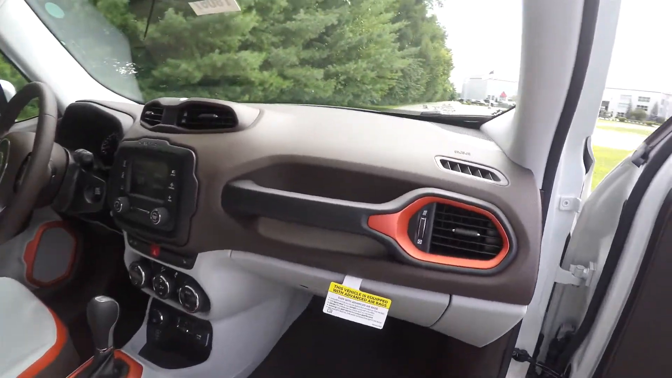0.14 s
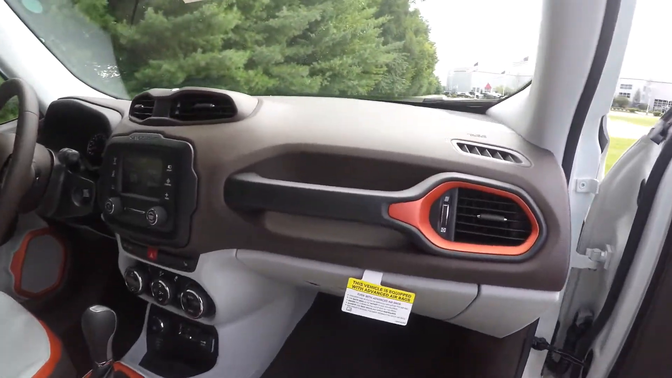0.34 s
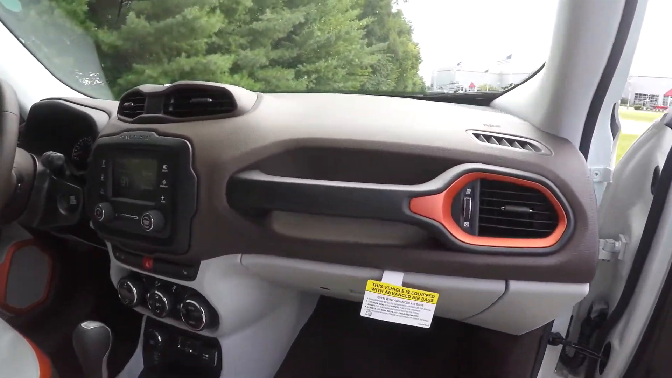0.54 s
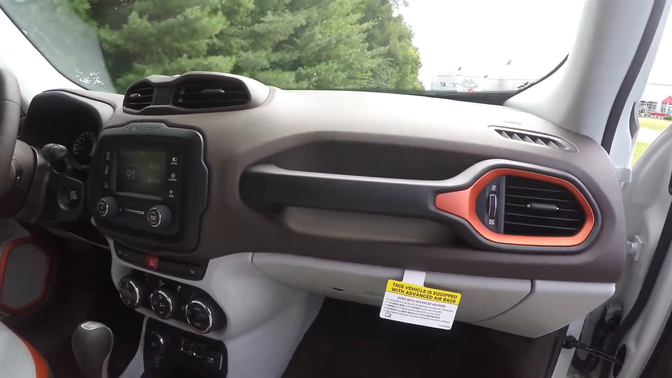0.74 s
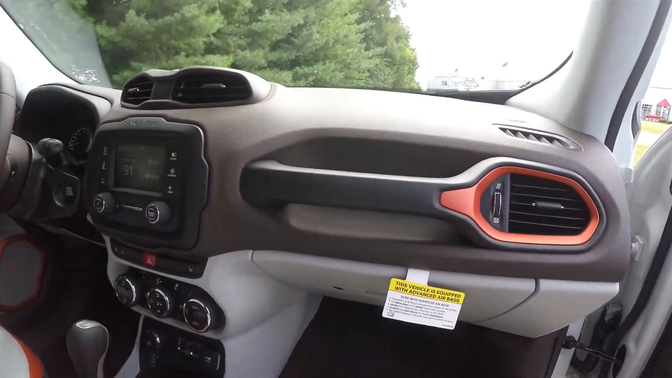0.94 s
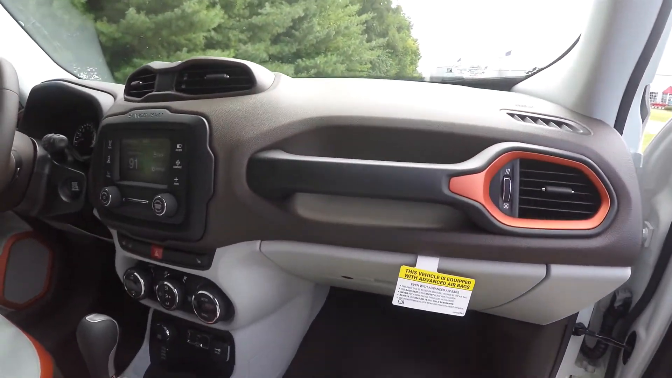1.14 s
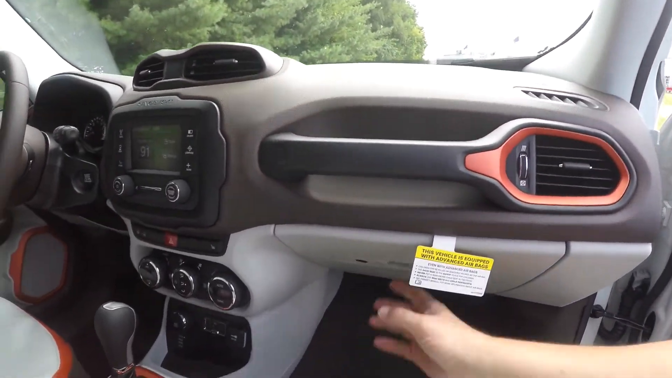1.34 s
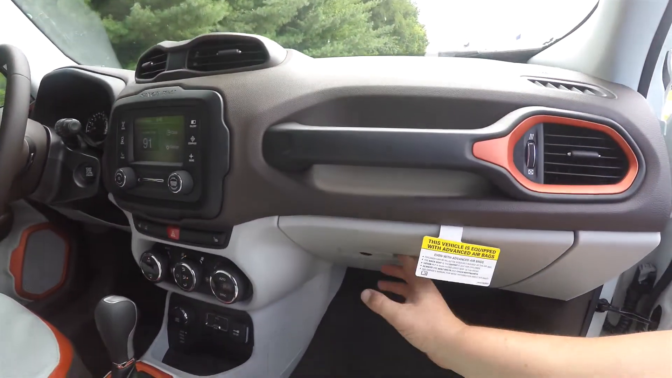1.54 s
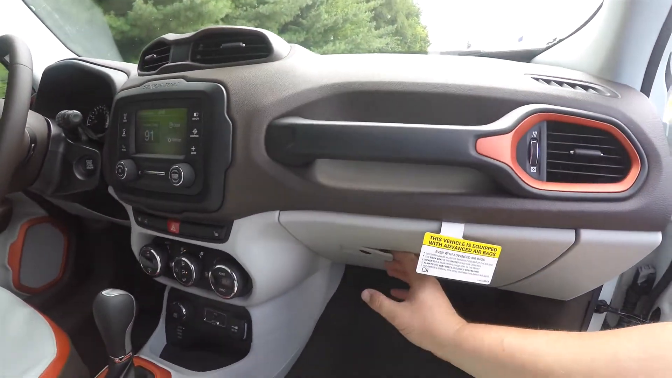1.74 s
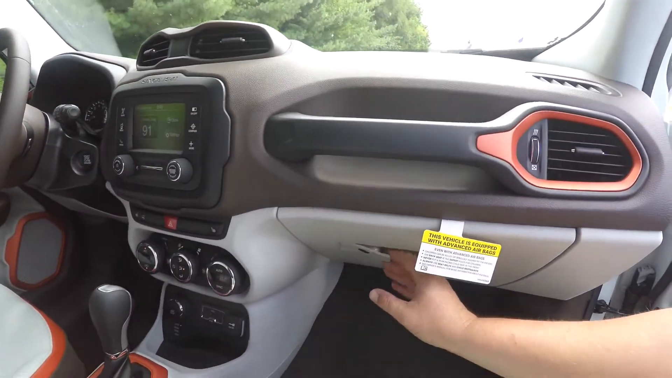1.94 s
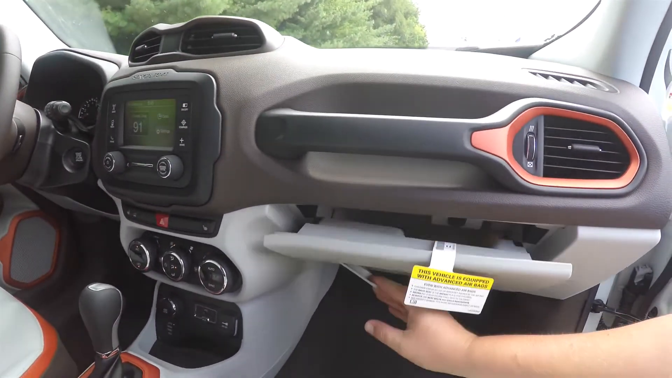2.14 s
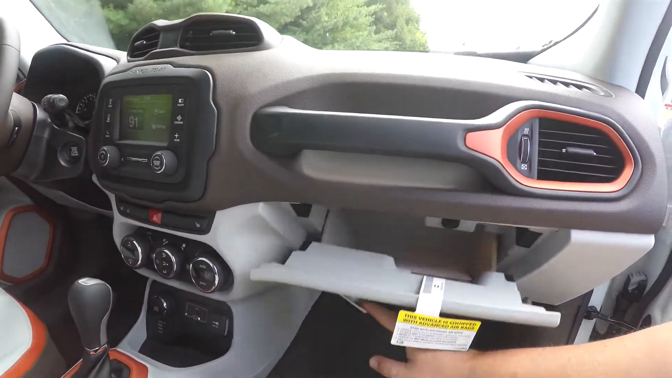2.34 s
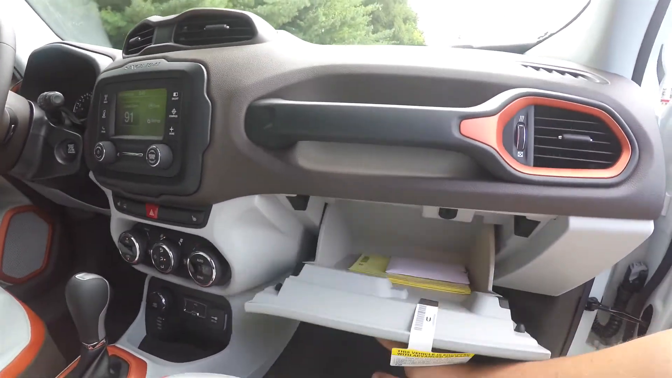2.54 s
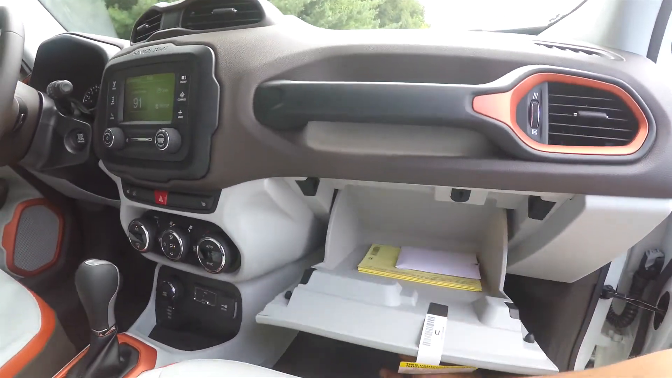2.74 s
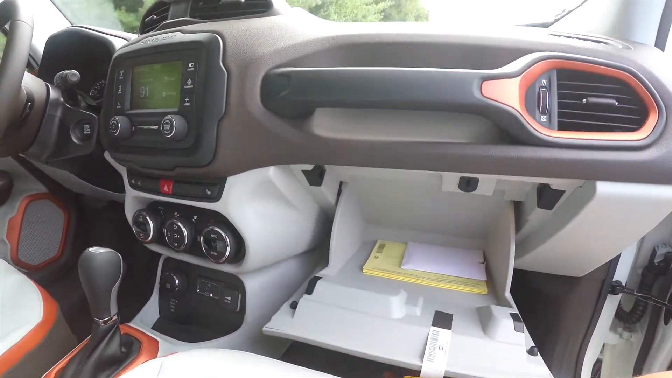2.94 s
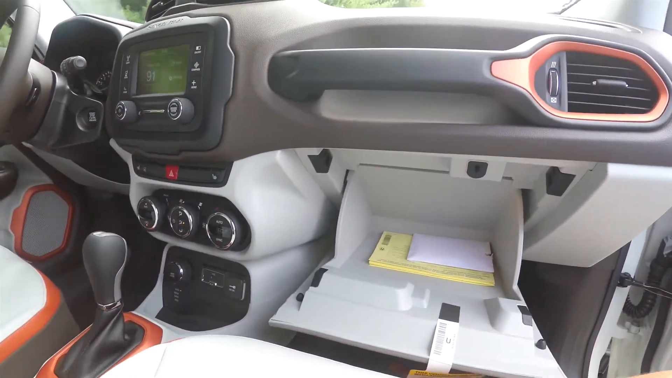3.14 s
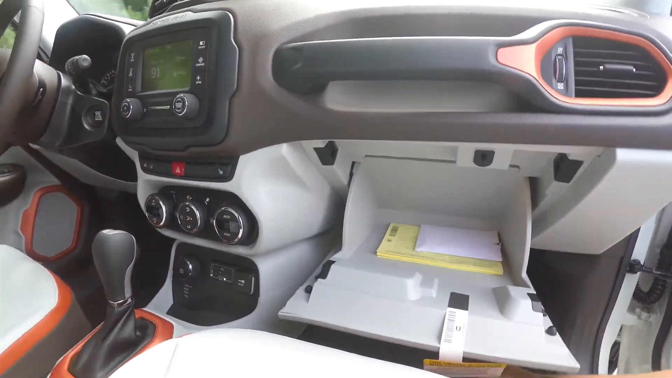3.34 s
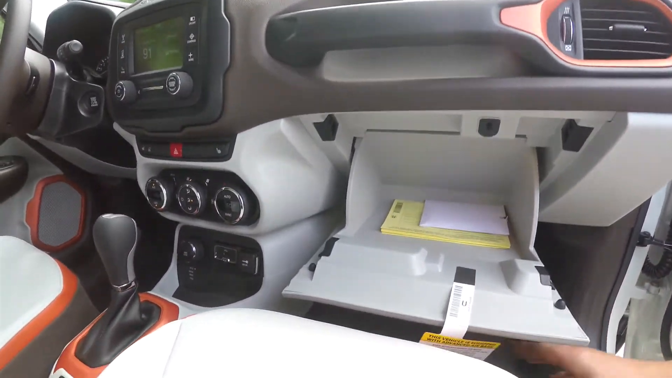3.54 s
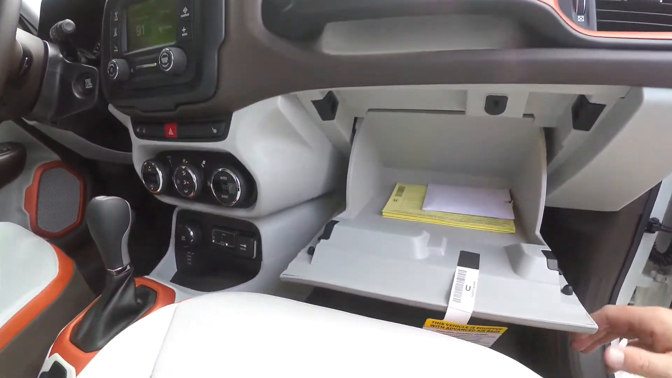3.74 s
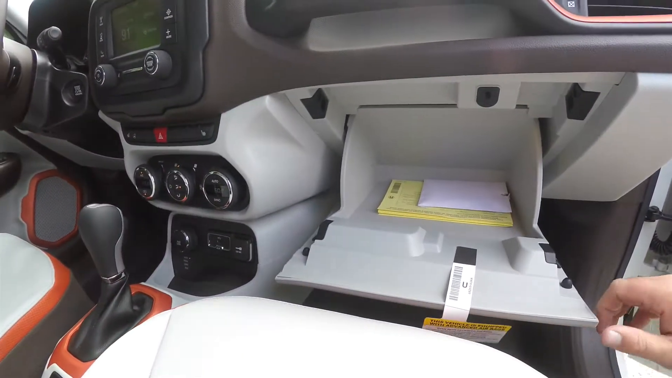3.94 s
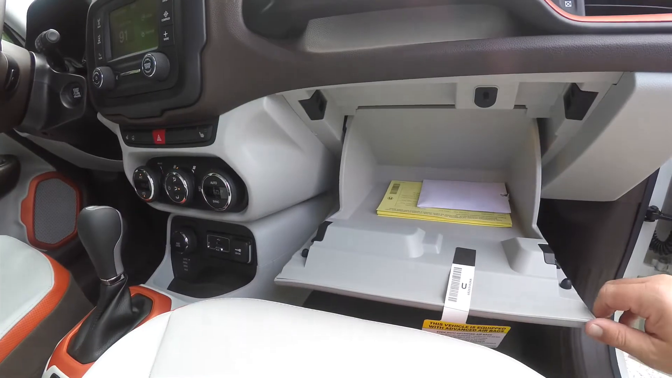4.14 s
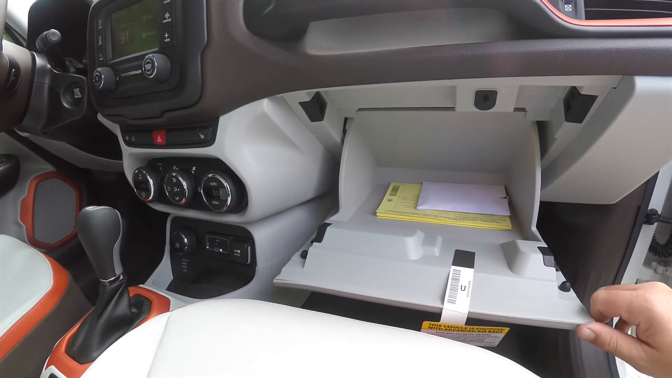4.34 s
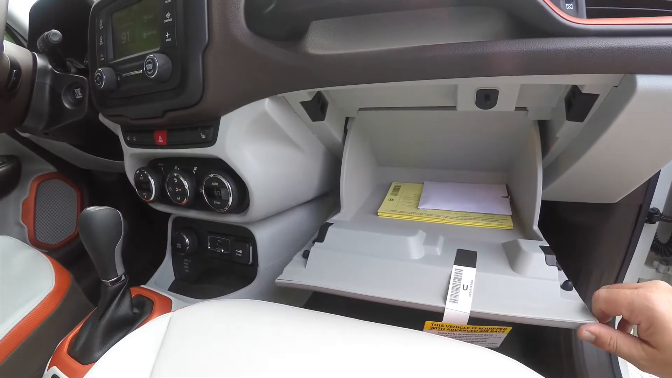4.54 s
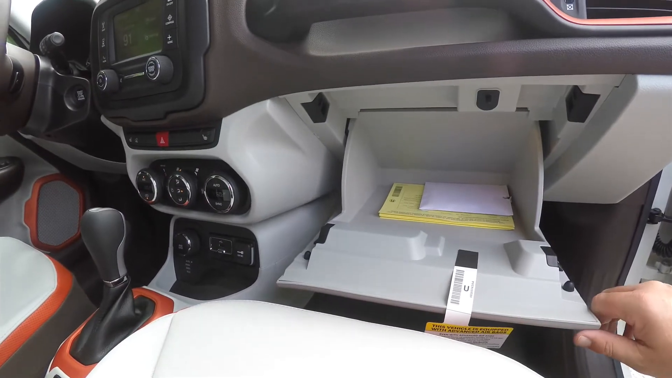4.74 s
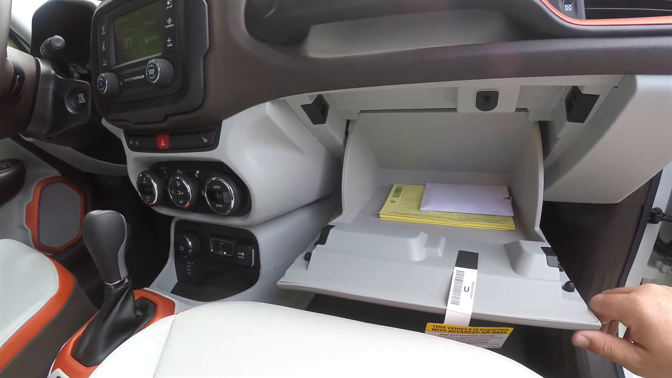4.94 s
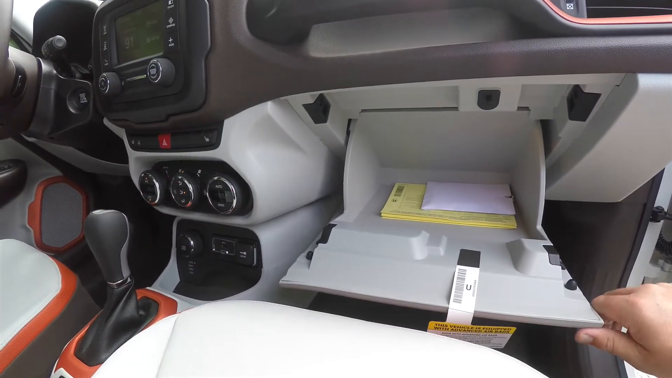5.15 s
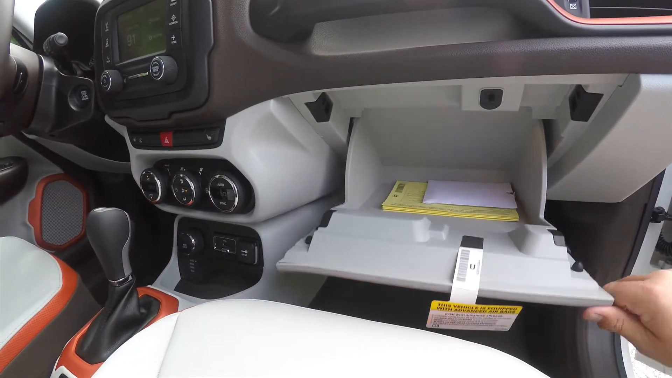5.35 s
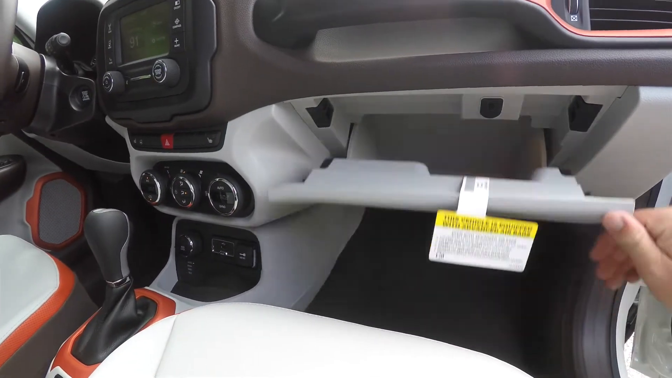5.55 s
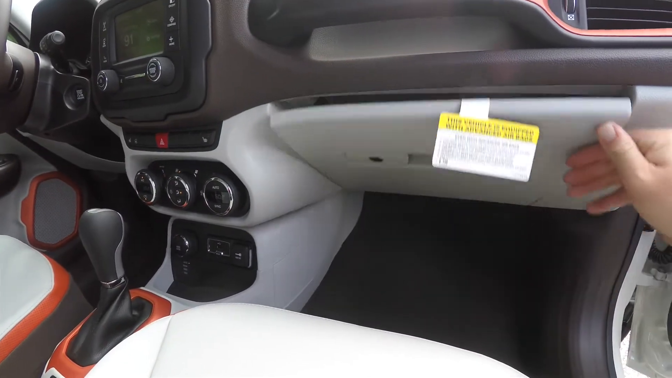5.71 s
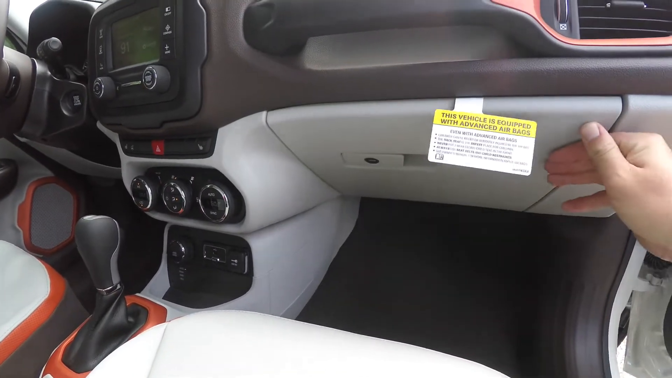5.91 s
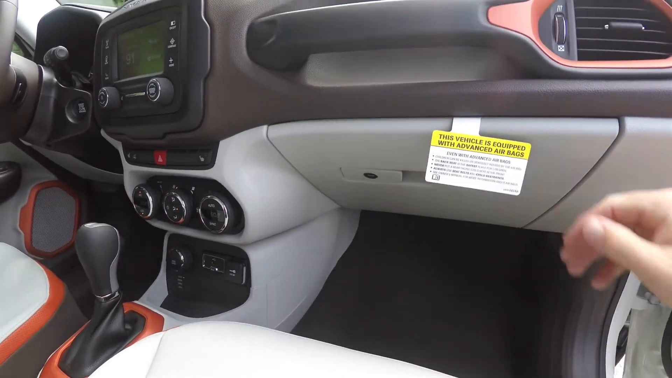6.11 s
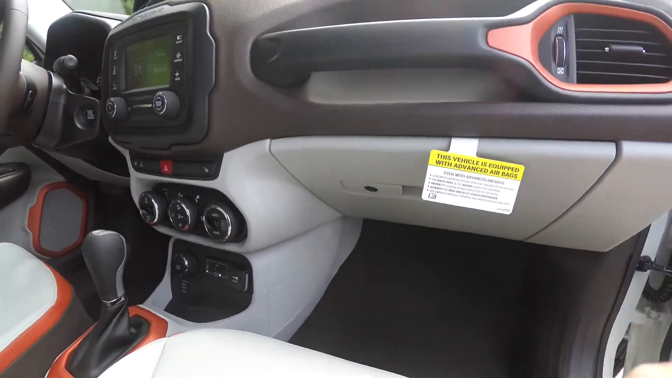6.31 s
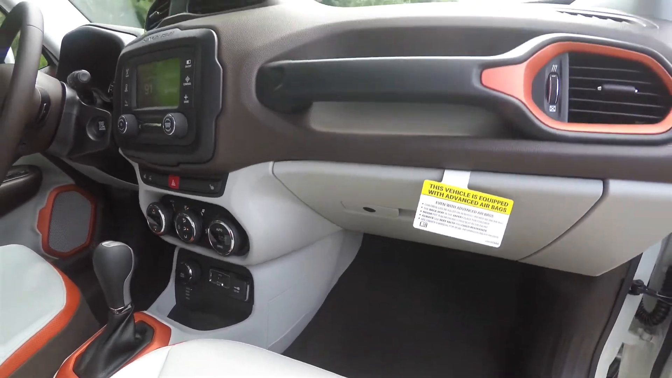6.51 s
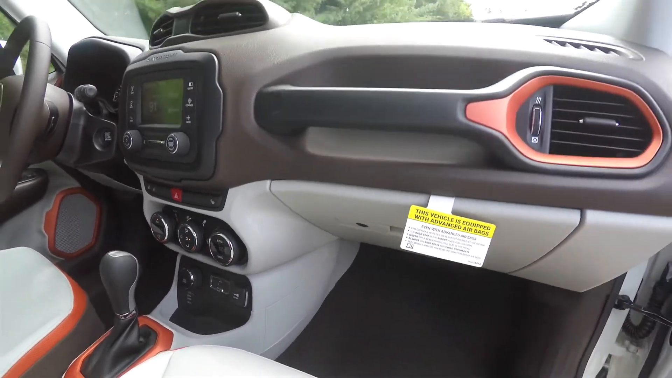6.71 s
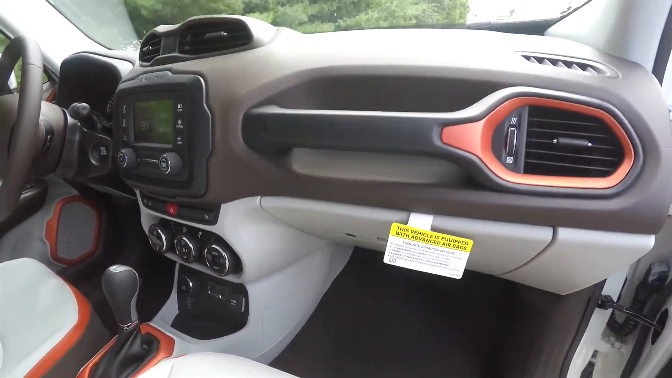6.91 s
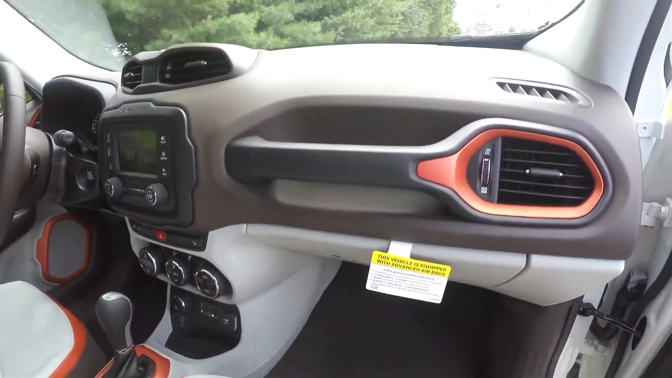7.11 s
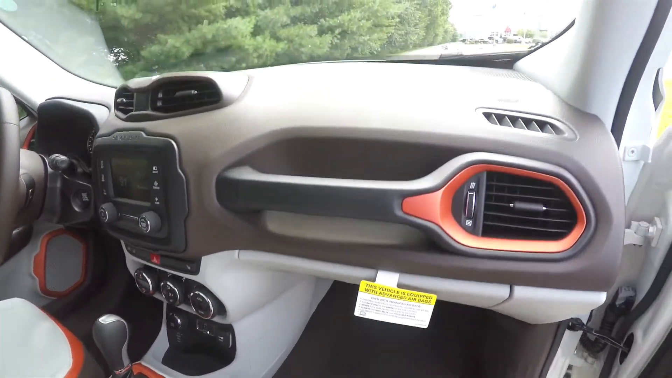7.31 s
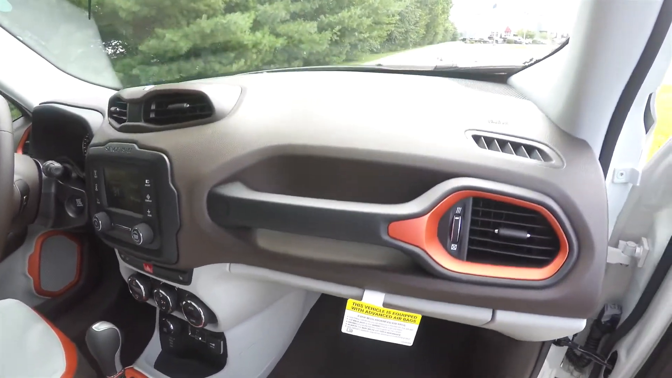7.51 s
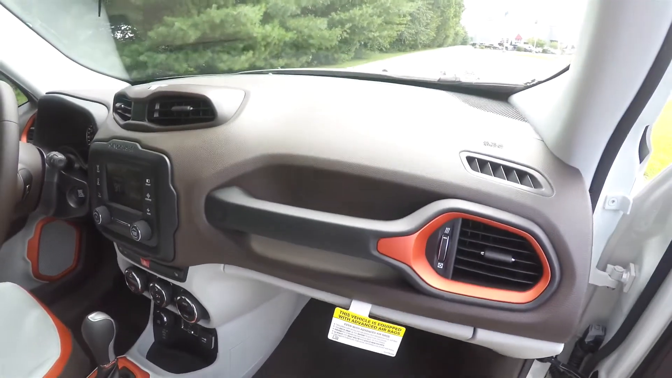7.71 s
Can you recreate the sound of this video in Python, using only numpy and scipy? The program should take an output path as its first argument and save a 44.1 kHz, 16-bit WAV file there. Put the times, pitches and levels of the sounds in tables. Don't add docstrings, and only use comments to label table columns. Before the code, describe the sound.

Close inside a parked car, with steady traffic wash and faint idle rumble through the open door, fingers tap softly on plastic trim. A latch clicks and the lid is released, then knocks sharply against its stops. Light taps follow, a passing engine drones low, and the lid is shut with a loud, rattly double snap. A few soft taps end it. A small camera microphone at arm's length gives a hissy stereo.

```python
import sys
import numpy as np
from scipy import signal
from scipy.fft import rfft, irfft, next_fast_len
from scipy.io import wavfile
from scipy.ndimage import uniform_filter1d, map_coordinates

SR = 44100
rng = np.random.default_rng(int(sys.argv[2]) if len(sys.argv) > 2 else 0)


def master(y):
    cut = np.clip(np.atleast_2d(y).T, -1, 1)
    pcm = np.round(cut * 32767)
    wavfile.write(sys.argv[1], SR, pcm.astype(np.int16))


def field_ratio(decibels):
    return 10 ** (np.asarray(decibels, dtype=float) / 20)


N = 347067

# time in seconds, strength in dB.
ROAD_WASH = [(0.0, -41.5), (0.42, -40.5), (0.63, -42.5), (1.3, -42), (2.12, -42), (2.3, -45), (3.22, -44.5),
             (3.4, -43), (3.7, -43.5), (4.1, -44.5), (4.45, -45), (5.0, -44.5), (5.6, -46), (6.14, -46.5),
             (7.3, -42.5), (7.54, -40), (7.87, -43.5)]
# time in seconds, strength in dB.
NEAR_TYRES = [(0.0, -46), (0.39, -44), (0.68, -47.5), (0.88, -47.5), (1.14, -43.5), (1.47, -47.5),
              (1.86, -45), (2.39, -46.5), (2.63, -44), (3.0, -47.5), (4.38, -45), (4.49, -47),
              (5.74, -46.5), (6.27, -45.5), (7.36, -45.5), (7.87, -47)]
# frequency in Hz, level in dB per Hz.
RUMBLE_SUM = [(8, -17.5), (14, -0.5), (27, -3), (35, -16.5), (50, -4.5), (70, -19.5), (110, -12.5),
              (180, -13.5), (254, -16), (345, -23.5), (450, -30.5), (800, -120)]
ROAD_SUM = [(190, -26), (330, -15), (350, -51.5), (404, -13), (445, -12), (539, -8.5), (617, -6.5),
            (693, -6.5), (890, -2), (1560, -7), (1750, -7.5), (2310, -8.5), (3300, -38), (4290, -91),
            (7260, -120)]
HISS_SUM = [(1760, -34.5), (3000, -18), (3440, -9.5), (4530, 4.5), (4950, -3.5), (5420, -20.5), (6090, -3),
            (6470, -1.5), (6980, -6.5), (7900, -6.5), (8520, -15), (9510, -18), (10300, -24), (13000, -28),
            (15500, -47)]
ROAD_DIFFERENCE = [(12, -36), (20, 4.5), (35, 5), (65, -23.5), (150, -13), (325, -29), (871, -8),
                   (1780, -10), (2330, -16), (3000, -19.5), (3900, -38), (6600, -120)]
HISS_DIFFERENCE = [(1530, -36), (2600, -1.5), (3060, -1.5), (4390, 6), (5250, -0.5), (6370, -25),
                   (6760, -38), (7180, -26), (7510, -13), (7910, -15), (8720, -24.5), (9820, -17),
                   (11300, -30.5), (13600, -36), (15500, -46.5)]
# time in seconds, dB by which the ports cancel in their null.
CAMERA_AIM = [(0, -1), (.6, 1), (1.6, -1.5), (1.95, 0.5), (2.7, 5), (2.95, 1.5), (3.5, 2.5), (3.85, 6.5),
              (4.0, 11), (4.7, 7), (5.3, 4), (5.45, -1), (5.65, 6), (5.9, 1.5), (6.45, 3.5), (6.8, 3),
              (7.1, -3.5), (7.4, -2)]
# frequency in Hz, level in dB rms.
IDLE_LINES = [(22.4, -40.5), (45, -53.5), (98, -59)]
# time in seconds, pitch of shaft order 11 in Hz, its level in dB.
PASSING_ENGINE = [
    (4.2, 205, -54.5),
    (4.6, 206, -54.5),
    (5.0, 218, -43.5),
    (5.3, 210, -40.5),
    (5.8, 208, -39.5),
    (6.2, 212, -41.5),
    (7.0, 207, -43.5),
    (7.5, 202, -46),
    (7.87, 200, -49.5),
]
# shaft order as a number, level in dB re order 11.
SHAFT_ORDERS = [(5, -15), (6, -18), (8, -17), (9, -16), (12, -18), (13, -13)]
# start in seconds, peak in dB, pitch in Hz, t60 in seconds.
SOFT_TAPS = [(0.053, -18.5, 806, 0.037), (0.437, -19.5, 910, 0.079), (0.457, -20.5, 616, 0.06),
             (0.49, -25, 904, 0.24), (0.562, -23, 910, 0.099), (0.6665, -13.5, 905, 0.025),
             (0.884, -20.5, 700, 0.04), (1.008, -20.5, 653, 0.081), (1.274, -21, 957, 0.081),
             (1.445, -29, 600, 0.058), (1.57, -25.5, 630, 0.11), (2.1, -15.5, 840, 0.032),
             (2.345, -20.5, 1000, 0.028), (2.46, -26, 1850, 0.071), (2.557, -24, 1980, 0.072),
             (2.589, -32, 1815, 0.5), (2.697, -21.5, 860, 0.087), (2.779, -24, 802, 0.073),
             (2.814, -26, 647, 0.093), (2.894, -20, 667, 0.087), (3.7515, -9.5, 763, 0.025),
             (3.764, -16, 780, .03), (3.774, -19, 754, .03), (3.8665, -9.5, 770, 0.017),
             (3.879, -21, 760, .03), (3.935, -26, 780, 0.089), (4.295, -18, 908, 0.069),
             (4.297, -28, 1408, 0.19), (4.372, -23, 990, 0.05), (4.41, -21.5, 1020, 0.05),
             (4.445, -28, 1026, 0.32), (4.89, -18, 1010, 0.02), (4.948, -23, 1000, 0.088),
             (6.392, -22, 707, 0.043), (6.963, -21.5, 810, 0.12), (7.205, -38, 1020, .06),
             (7.4815, -14.5, 990, 0.03), (7.528, -19, 720, .04), (7.54, -19, 1250, 0.044),
             (7.593, -14, 1000, 0.036), (7.746, -28, 1000, 0.025)]
# start in seconds, peak in dB, pitch in Hz, t60 in seconds.
TRIM_SCUFFS = [(0.359, -42, 930, 0.24), (.455, -40, 450, 0.05), (.49, -41, 875, 0.27),
               (.668, -42, 700, 0.1), (1.005, -42.5, 750, .12), (2.44, -45, 990, .2),
               (2.696, -39, 750, 0.14), (2.701, -46, 1800, 0.11), (2.776, -42, 1510, 0.14),
               (2.78, -42, 2200, 0.083), (2.81, -42, 800, .1), (2.81, -46, 1800, 0.08),
               (2.844, -44.5, 1050, 0.056), (2.89, -39, 900, 0.098), (2.893, -43, 2090, 0.077),
               (4.295, -40, 1040, 0.23), (4.375, -47, 1450, .2), (4.44, -43, 1000, 0.35),
               (4.495, -44, 1400, 0.053), (7.391, -42, 950, .2), (7.52, -40, 1150, .3),
               (7.585, -39, 1200, 0.12)]
# start in seconds, latch ring in dB, panel push in dB, panel pitch in Hz.
LID_CONTACTS = [(2.026, -27.5, -32, 443), (2.03, -26.5, -17, 950), (2.0308, -25, -15.5, 484),
                (2.032, -29, -33.5, 770), (2.0343, -26.5, -34.5, 1575), (2.0374, -41, -15, 1170),
                (2.046, -35, -22, 836), (2.05, -27.5, -28.5, 433), (2.06, -41, -24.5, 1000),
                (2.307, -29, -25.5, 780), (2.316, -32, -25, 390), (3.312, -36.5, -25, 477),
                (3.3185, -24, -13, 499), (3.3213, -28.5, -8.5, 444), (3.322, -13, -29, 1200),
                (3.3245, -23.5, -8.5, 579), (3.33, -33, -21, 850), (3.335, -44, -15, 745),
                (3.343, -41, -24, 750), (3.34, -44, -30.5, 440), (5.7609, -19.5, -20, 408),
                (5.7637, -13.5, -22, 1114), (5.767, -14.5, -24.5, 600), (5.7751, -12, -17, 815),
                (5.783, -18, -17, 770), (5.79, -22.5, -22.5, 383), (5.798, -19, -15.5, 970),
                (5.8015, -13.5, -21, 690), (5.806, -18, -15.5, 720), (5.8095, -23, -13.5, 600),
                (5.814, -27.5, -16.5, 705), (5.82, -23.5, -21, 850), (5.83, -40.5, -40, 775)]
# start in seconds, snap in dB, length in seconds.
EDGE_CLACKS = [
    (2.0505, -41, .006),
    (2.307, -44.5, .002),
    (3.3195, -34, .004),
    (5.76, -38, .005),
    (5.7988, -26, .0035),
    (7.3822, -49, .0012),
]
# centre in Hz, width in Hz, level in dB.
PANEL_MODES = [(179, 44, -8), (350, 110, -5.5), (535, 150, 6), (770, 230, 18), (1200, 310, -11)]
LATCH_MODES = [(1070, 1160, -14), (1580, 300, -9.5), (1820, 59, -10.5), (2094, 255, -1.5), (2300, 176, 0.5),
               (2660, 490, -12.5)]
# frequency in Hz, level in dB per Hz.
SNAP_SUM = [(1760, -25), (3000, -3), (3100, -15.5), (4690, 1), (5490, -10), (6300, 0), (6700, -9),
            (7480, -7), (8180, -10), (9190, -14), (10600, -21), (11700, -17), (13500, -29), (14400, -27),
            (15500, -36)]
SNAP_DIFFERENCE = [(1500, -40), (2600, -4.5), (3750, -1.5), (4550, 3), (5740, -10.5), (6760, -29),
                   (7560, -12.5), (8900, -16.5), (9800, -16.5), (11500, -29), (12600, -44), (13400, -30),
                   (15500, -40)]
# start in seconds, peak in dB, pitch in Hz, t60 in seconds.
PAWL_NOTES = [(2.033, -20.5, 2300, 0.04), (2.04, -32, 2300, 0.025), (2.308, -33, 2210, .03),
              (2.896, -28, 1930, 0.036), (2.895, -31.5, 2344, 0.064), (3.31, -27, 2380, .04),
              (3.3172, -17, 2130, .03), (3.3215, -11.5, 2380, 0.022), (3.3205, -11, 1746, 0.022),
              (5.764, -17, 2230, .03), (5.7748, -10, 2190, 0.029), (5.798, -17.5, 2570, 0.016),
              (5.8012, -11.5, 1870, 0.036), (5.807, -13.5, 2300, 0.038), (5.819, -36, 2300, .04)]
# start in seconds, peak in dB, pitch in Hz, t60 in seconds.
LATCH_TINGS = [(2.031, -36, 4520, 0.024), (2.05, -48, 7400, .035), (2.051, -48.5, 4570, 0.035),
               (2.308, -49, 4630, 0.032), (3.319, -44, 4690, .04), (3.3195, -36, 6180, .05),
               (5.761, -46, 6500, .04), (5.766, -38, 4680, .04), (5.766, -47, 7860, .04),
               (5.777, -29.5, 4700, .03), (5.783, -40, 6440, 0.029), (5.7985, -34, 4700, 0.018),
               (5.8, -36.5, 6460, 0.057), (5.802, -40.5, 8100, 0.045), (5.806, -38, 4700, 0.033)]
# frequency in Hz, difference over sum in dB.
TING_DIFFERENCE = [(4600, 8), (6500, -15), (7800, 0.5)]
# start in seconds, peak in dB, pitch in Hz, t60 in seconds.
CABIN_BOOMS = [
    (2.046, -26, 46.4, 0.15),
    (3.321, -32, 179, 0.36),
    (3.322, -23, 254, 0.044),
    (5.759, -26.5, 85, .09),
    (5.775, -27, 151, 0.08),
    (5.763, -38.5, 252, 0.42),
    (5.797, -22.5, 31, 0.14),
    (5.8, -40, 176, 0.1),
    (5.802, -27.5, 114, 0.077),
    (5.842, -17.5, 46, 0.14),
]
# frequency in Hz, t60 in seconds.
CABIN_DECAY = [(150, 0.32), (600, 0.056), (2500, 0.092), (10000, 0.05)]
MUTE_BANDS = [2700, 3050, 3450, 3800, 4150, 5170, 5680, 6300, 6900, 7250, 7600, 8300, 8950, 9650, 10300,
              11000]
# frequency in Hz, gap in dB.
MUTE_GAP = [(3000, 10.5), (3600, 15.5), (4700, 21), (5400, 7.5), (6900, 9), (7900, 3), (8600, 3),
            (10000, 4.5)]
# frequency in Hz, level in dB.
NEVER_MUTED = [(7000, -54), (9000, -67)]


def unit(x):
    return x / np.sqrt(np.mean(x ** 2) + 1e-20)


def along(points, hz):
    f, v = np.transpose(points)
    return np.interp(np.log(hz + 1), np.log(f + 1), v)


def curves(rows):
    s, *cols = np.transpose(rows)
    return [np.interp(np.arange(N) / SR, s, c) for c in cols]


def wobble(rate):
    knots = rng.standard_normal(int(N * rate / SR) + 4)
    return map_coordinates(knots, [np.arange(N) * rate / SR])


def filtered(x, response):
    m = next_fast_len(N + SR // 2)
    hz = np.fft.rfftfreq(m, 1 / SR)
    return irfft(rfft(x, m) * response(hz), m)[..., :N]


def resonant(x, modes):
    def response(f):
        total = 0
        for k, (centre, width, db) in enumerate(modes):
            damping = 1j * f * width
            total = total + (-1) ** k * field_ratio(db) * damping / (centre ** 2 - f ** 2 + damping)
        return total
    return filtered(x, response)


def patchy(depth_db):
    z = signal.stft(rng.standard_normal(N), nperseg=512)[2]
    field = uniform_filter1d(rng.standard_normal(z.shape), size=4, axis=0)
    field = uniform_filter1d(field, size=12, axis=1)
    return signal.istft(z * field_ratio(depth_db * unit(field)), nperseg=512)[1][:N]


def coloured(x, spectrum, turn=1):
    return unit(filtered(x, lambda hz: turn * field_ratio(along(spectrum, hz))))


def aimed(x):
    null_hz, null_width_hz = 3723, 705
    depth_db, = curves(CAMERA_AIM)
    null = filtered(x, lambda hz: np.exp(-((hz - null_hz) / null_width_hz) ** 4))
    return x + (field_ratio(-depth_db) - 1) * null


def outdoors():
    low_db, = curves(ROAD_WASH)
    high_db, = curves(NEAR_TYRES)
    road = patchy(depth_db=1.0)

    def split(hz):
        upper = 1 / (1 + (1350 / (hz + 1)) ** 6)
        return field_ratio(along(ROAD_SUM, hz)) * [1 - upper, upper]

    low, high = filtered(road, split)
    mid = field_ratio(low_db + 0.82 * wobble(22)) * unit(low)
    mid += field_ratio(high_db - 1.68 + 0.76 * wobble(8.3)) * unit(high)
    mid += field_ratio(-44.5) * coloured(patchy(depth_db=0.66), RUMBLE_SUM)
    early = 0.67 * coloured(road, ROAD_DIFFERENCE, turn=1j)
    early += 0.64 * coloured(patchy(depth_db=0.5), ROAD_DIFFERENCE)
    side = field_ratio((low_db + high_db) / 2 - 5.0) * early - 0.068 * mid
    hiss_mid = field_ratio(-64.5) * coloured(patchy(depth_db=3.0), HISS_SUM)
    hiss_side = field_ratio(-56.5) * coloured(patchy(depth_db=-2.0), HISS_DIFFERENCE)
    hiss_gain = field_ratio(0.4 * (np.arange(N) - N / 2) / SR)
    return np.array([aimed(mid + hiss_gain * hiss_mid), side + hiss_gain * hiss_side])


def idling_engine():
    t = np.arange(N) / SR
    out = np.zeros(N)
    for hz, db in IDLE_LINES:
        out += field_ratio(db + 3 + 2.5 * wobble(5)) * np.sin(2 * np.pi * hz * t + 0.6 * wobble(3))
    return out


def passing_engine():
    nearest_s, near_width_s = 5.62, 0.55
    pitch_hz, main_db = curves(PASSING_ENGINE)
    near = np.exp(-((np.arange(N) / SR - nearest_s) / near_width_s) ** 2)
    shaft = 2 * np.pi * np.cumsum(pitch_hz) / SR / 11

    def line(order, db, rough):
        level = field_ratio(db + 3 + rough * wobble(7))
        return level * np.sin(order * shaft + 0.3 * rough * wobble(5))

    drone = line(order=11, db=main_db, rough=0.5)
    drone += line(order=10, db=main_db - 1 - 24 * near, rough=1.4)
    drone += near * line(order=19, db=main_db - 22, rough=4.5)
    drone += near * line(order=18, db=main_db - 22, rough=1.9)
    for order, db in SHAFT_ORDERS:
        drone += line(order, main_db + db, rough=2.2)
    return drone


def rings(events, attack, spread, click, pair):
    out, t = np.zeros(N + SR), np.arange(SR // 2) / SR
    skin = signal.butter(5, [450, 1500], "bandpass", fs=SR, output="sos")
    for s, db, hz, t60 in events:
        tone = np.sin(2 * np.pi * hz * t)
        tone += pair * np.sin(2 * np.pi * hz * spread * t + 2 * np.pi * rng.random())
        tone += click * field_ratio(-60 * t / 0.11) * signal.sosfilt(skin, rng.standard_normal(len(t)))
        out[round(s * SR):][:len(t)] += field_ratio(db - 60 * t / t60) * (1 - np.exp(-t / attack)) * tone
    return out[:N]


def taps():
    return field_ratio(-9.0) * rings(SOFT_TAPS, attack=0.00092, spread=0.94, click=1.6, pair=0.34)


def scuffs():
    sharpness_q, grain_db, skin_top_hz = 3, 3.5, 2500
    out, t = np.zeros(N + SR), np.arange(SR // 2) / SR
    grain = field_ratio(grain_db * np.pad(wobble(150), (0, SR)))
    for s, db, hz, t60 in TRIM_SCUFFS:
        b, a = signal.iirpeak(hz, sharpness_q, SR)
        rub = unit(signal.lfilter(b, a, rng.standard_normal(len(t))))
        out[round(s * SR):][:len(t)] += field_ratio(db - 60 * t / t60) * (1 - np.exp(-t / 0.0025)) * rub
    soft = signal.butter(10, skin_top_hz, fs=SR, output="sos")
    return signal.sosfilt(soft, out * grain)[:N]


def lid_events():
    events = []
    for s, ring_db, panel_db, panel_hz in LID_CONTACTS:
        force_db = 20 * np.log10(np.hypot(field_ratio(ring_db), field_ratio(panel_db))) + 16
        snap_db = -47 + 1.4 * force_db
        scrape_s = 0.0055 * field_ratio(-0.35 * force_db)
        events.append((s, ring_db, panel_db, panel_hz, snap_db, scrape_s))
    for s, snap_db, scrape_s in EDGE_CLACKS:
        events.append((s, -np.inf, -np.inf, 1, snap_db, scrape_s))
    return events


def scrape(t, length):
    shared = 0.75
    u = t / np.clip(length, 0.0005, 0.012)
    shape = np.sqrt(u) * np.exp(1 - u) ** np.array([[2], [1.2], [1.2]])
    force = shape * rng.standard_normal((3, len(t)))
    force[2] = shared * force[1] + np.sqrt(1 - shared ** 2) * force[2]
    force[0, 15] += 9
    wanted = np.linalg.norm(shape, axis=1, keepdims=True)
    return force * wanted / np.linalg.norm(force, axis=1, keepdims=True)


def panel_push(t, hz):
    turns = t * hz
    tone = np.sin(2 * np.pi * turns)
    tone += 0.5 * np.sin(2 * np.pi * 1.46 * turns)
    tone += 0.27 * np.sin(2 * np.pi * 2.164 * turns)
    return field_ratio(-60 * turns / 14) * (1 - np.exp(-turns / 0.33)) * tone


def lid():
    ring, thud, snap, wide = np.zeros((4, N + SR))
    t = np.arange(SR // 10) / SR
    for s, ring_db, panel_db, panel_hz, snap_db, length in lid_events():
        force = scrape(t, length)
        start = round(s * SR) - 20
        at = slice(start, start + len(t))
        ring[at] += field_ratio(ring_db + 3.5) * force[0]
        snap[at] += field_ratio(snap_db + 22.5) * force[1]
        wide[at] += field_ratio(snap_db + 27.5) * force[2]
        thud[at] += field_ratio(panel_db) * panel_push(t, panel_hz)
    body = thud[:N] + field_ratio(-33.0) * resonant(thud[:N], PANEL_MODES)
    body = filtered(body, lambda hz: (1j * hz / (1j * hz + 120)) ** 2)
    mid = resonant(ring[:N], LATCH_MODES) + body
    mid += filtered(snap[:N], lambda hz: field_ratio(along(SNAP_SUM, hz) - 17.5))
    side = filtered(wide[:N], lambda hz: 1j * field_ratio(along(SNAP_DIFFERENCE, hz) - 17.5))
    side += field_ratio(-8.0) * filtered(mid, lambda hz: 1j * hz / (hz + 1500) * (hz < 3000))
    return np.array([mid, side])


def latch_tings():
    tings = rings(LATCH_TINGS, attack=0.0011, spread=0.88, click=0, pair=0.6)
    return np.array([tings, filtered(tings, lambda hz: 1j * field_ratio(along(TING_DIFFERENCE, hz)))])


def latch_pawl():
    pawl = rings(PAWL_NOTES, attack=0.0009, spread=0.98, click=0, pair=0.34)
    return pawl * field_ratio([[-3], [-18]])


def cabin_booms():
    return rings(CABIN_BOOMS, attack=0.004, spread=1.22, click=0, pair=0.15)


def grip():
    tick_s, tick_t60_s, rub_s, thin_hz = 7.3822, 0.006, 0.025, 10500
    t = np.arange(N) / SR - tick_s
    shape = field_ratio(-47 - 60 * abs(t) / tick_t60_s) * (t >= 0)
    shape += field_ratio(-68) * np.exp(-(t / rub_s) ** 2)
    noise = shape * rng.standard_normal((2, N))
    return filtered(noise, lambda hz: (1j * hz / (1j * hz + thin_hz)) ** 4) * np.array([[1], [0.6]])


def cabin(x):
    hz, t, z = signal.stft(rng.standard_normal((2, SR // 4)), SR, nperseg=128)
    decay = field_ratio(-60 * t / along(CABIN_DECAY, hz)[:, None])
    tail = signal.istft(z * decay, SR, nperseg=128)[1]
    tail = tail / np.linalg.norm(tail[0])
    late = np.pad(x, ((0, 0), (130, 0)))
    return signal.fftconvolve(late, tail, axes=1)[:, :N]


def muted(x):
    pair = np.array([x[0] + x[1], x[0] - x[1]])
    pair = np.pad(pair, ((0, 0), (0, 2048)), "reflect") / 2
    hz, _, z = signal.stft(pair, SR, nperseg=1024)
    keep = np.ones(z.shape)
    for lo, hi in zip(MUTE_BANDS, MUTE_BANDS[1:]):
        band = (hz >= lo) & (hz < hi)
        power = uniform_filter1d(np.sum(abs(z[:, band]) ** 2, axis=1), size=3, axis=1)
        other = power[::-1]
        near_enough = power > other * field_ratio(-2 * along(MUTE_GAP, (lo + hi) / 2))
        loud = other > field_ratio(2 * along(NEVER_MUTED, lo))
        keep[:, band] = (near_enough | loud)[:, None]
    keep *= (abs(z) > field_ratio(-112)) | (hz < 8800)[:, None]
    mid, side = signal.istft(z * keep, SR, nperseg=1024)[1][:, :N]
    return np.array([mid + side, mid - side])


def scene():
    far = outdoors()
    bass = idling_engine() + passing_engine()
    touches = taps() + scuffs()
    near = np.array([touches, field_ratio(-17.0) * touches])
    near += lid() + latch_tings() + latch_pawl()
    bass += cabin_booms()
    mid, side = near + field_ratio(-12.0) * cabin(near) + far + grip() + bass * np.array([[1], [-0.04]])
    return np.array([mid + side, mid - side])


def top_cut(x):
    return signal.sosfilt(signal.butter(12, 15640, fs=SR, output="sos"), x)


def record(dry):
    top = signal.butter(16, 15050, fs=SR, output="sos")
    limited = signal.sosfiltfilt(top, dry)
    limited = limited / (1 + abs(limited / 0.52) ** 4) ** 0.25
    left_s = (N - np.arange(N)) / SR
    limited = limited * np.sin(np.pi / 2 * np.clip(left_s / 0.006, 0, 1)) ** 2
    return top_cut(muted(limited))


dry = scene()
out = record(dry)
master(out)
```